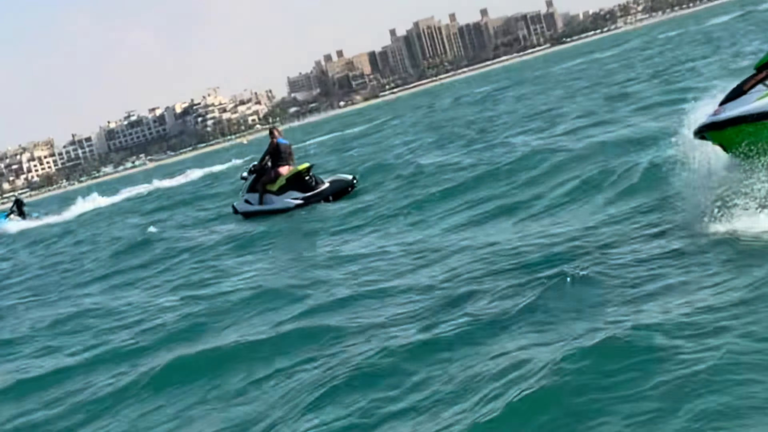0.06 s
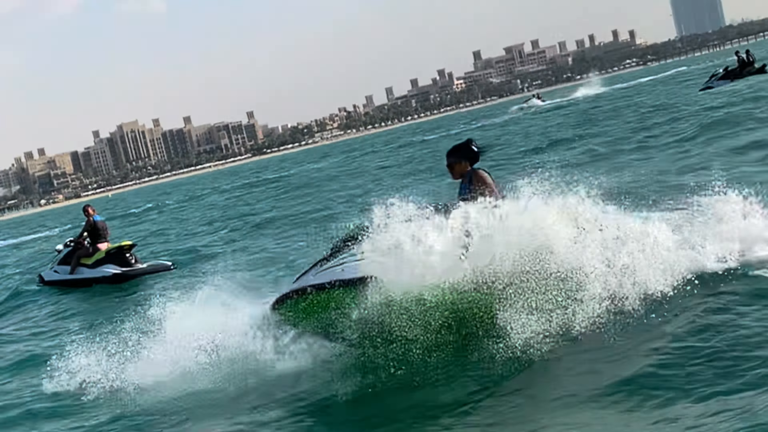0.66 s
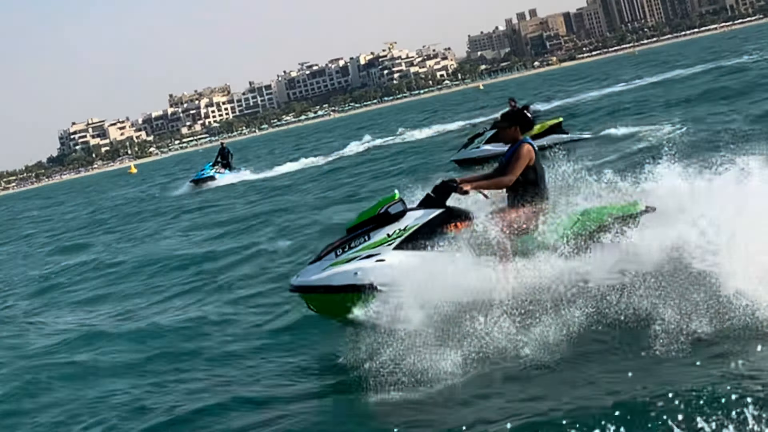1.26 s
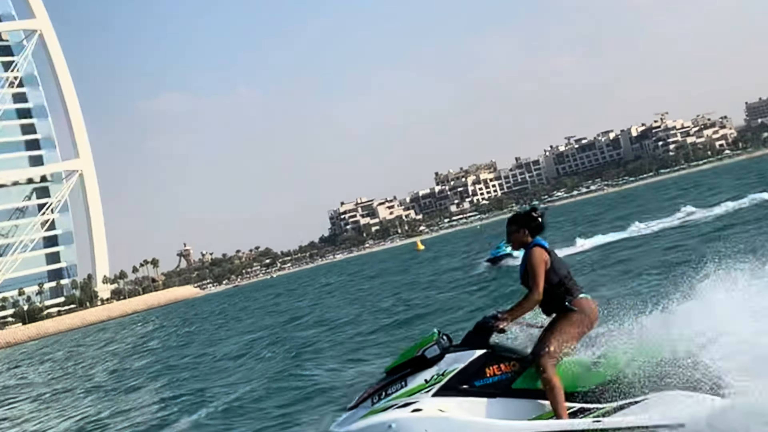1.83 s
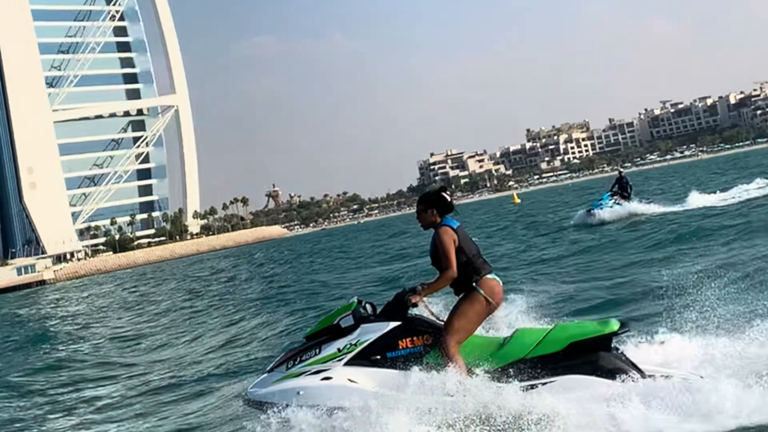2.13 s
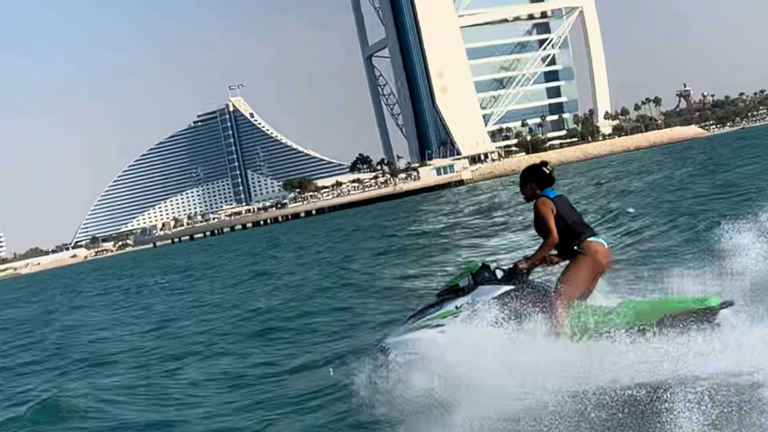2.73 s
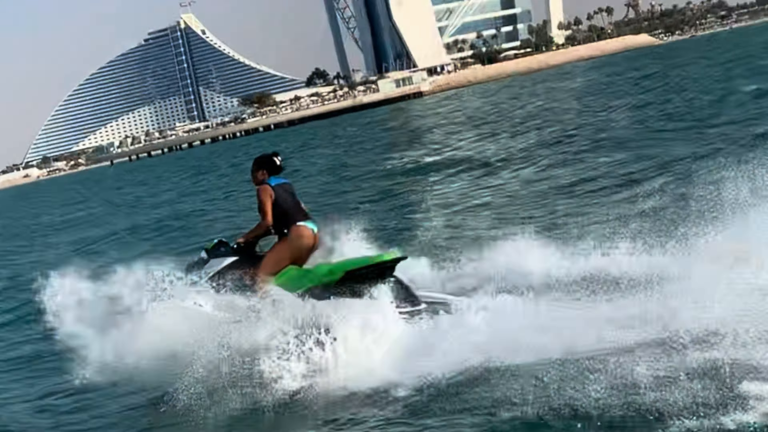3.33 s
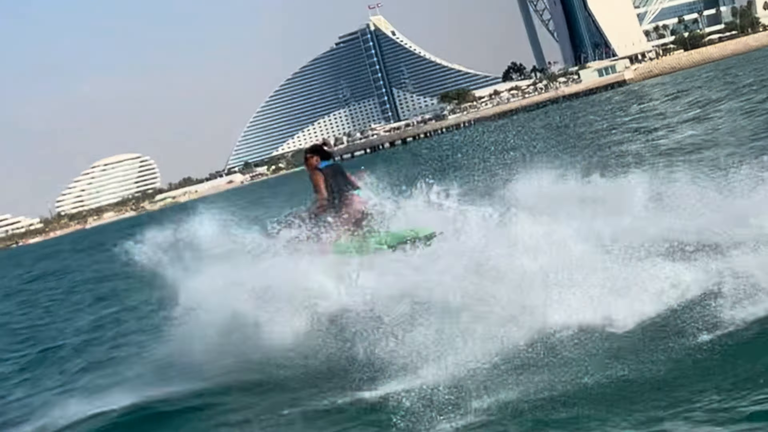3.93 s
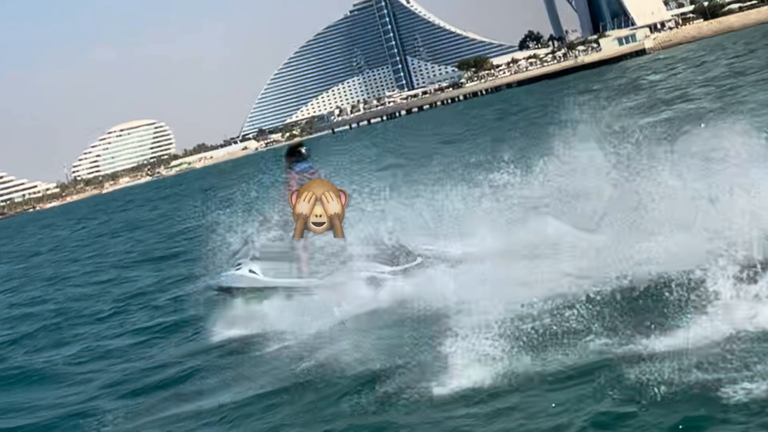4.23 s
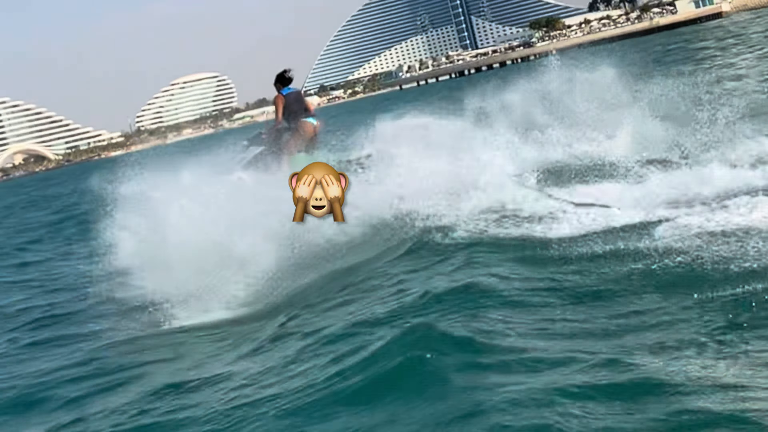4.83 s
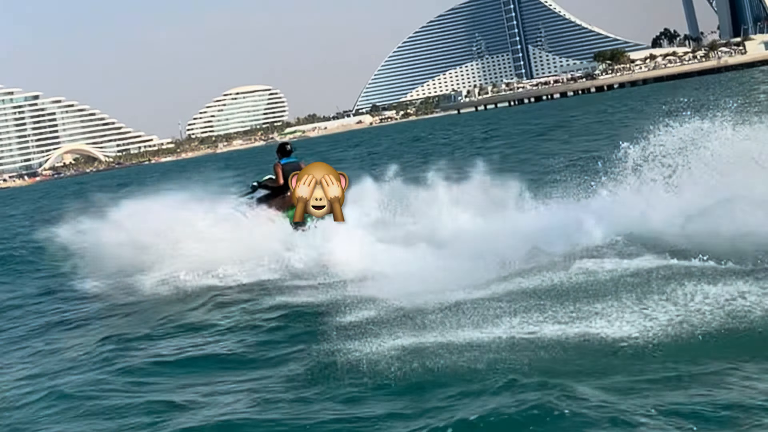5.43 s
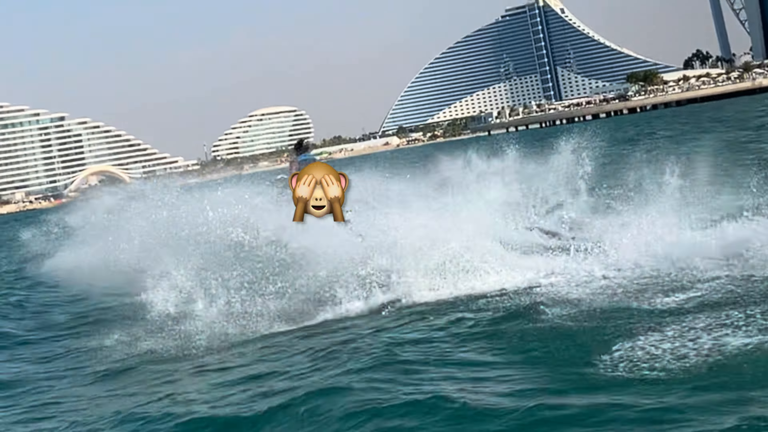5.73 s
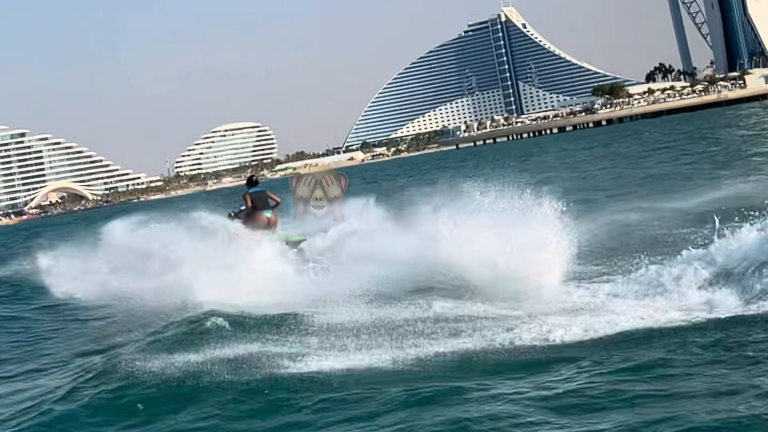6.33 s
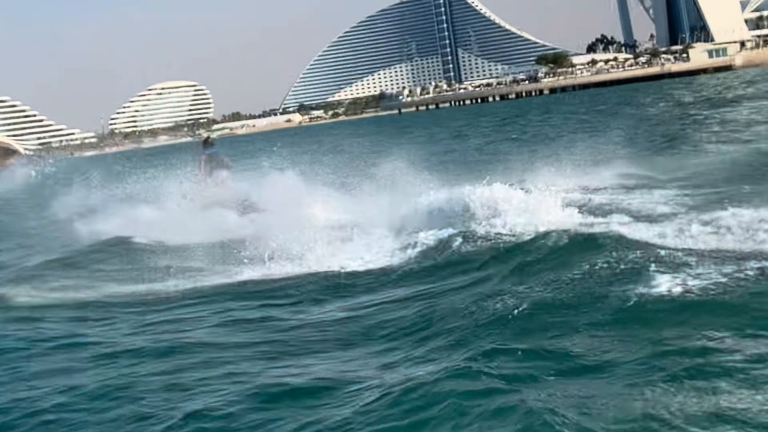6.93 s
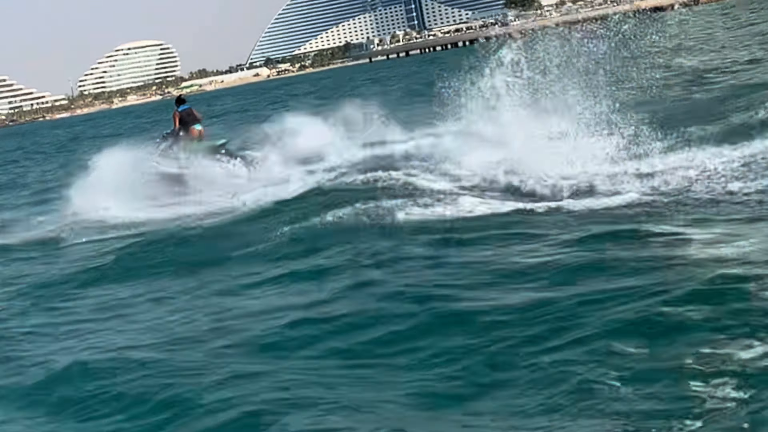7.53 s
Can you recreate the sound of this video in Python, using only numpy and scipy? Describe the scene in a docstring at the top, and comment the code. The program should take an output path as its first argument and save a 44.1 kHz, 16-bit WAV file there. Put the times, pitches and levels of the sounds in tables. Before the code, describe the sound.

Wind rumbles and tears at the microphone while a jet ski's muffled hum rises, sags and grows fainter amid spray and slapping waves.

```python
"""Jet ski on choppy water

The exhaust note rises and sags as the hull rides the waves: clear at first, then dropping
away and returning fainter under the head wind. Eddies buffet, thump and tear at two
microphone ports, once in a burst of sharp cracks. Crests slap the hull; spray hisses throughout."""
import sys
import numpy as np
from scipy import signal
from scipy.fft import rfft, irfft, next_fast_len
from scipy.io import wavfile
from scipy.ndimage import uniform_filter1d, map_coordinates

SR = 44100
rng = np.random.default_rng(int(sys.argv[2]) if len(sys.argv) > 2 else 0)


def wrap_up_sound(samples):
    """Save the sound to the file named by the first command line argument, as 16-bit audio."""
    columns = np.atleast_2d(samples).T
    # keep every value between -1 and 1, then stretch to whole-number steps
    tamed = np.clip(columns, -1, 1)
    steps = np.round(tamed * 32767).astype(np.int16)
    wavfile.write(sys.argv[1], SR, steps)


N = 338247

# left/right correlation set by the port spacing: freq_hz, correlation
PORT_CORRELATION = [(850, 1), (1100, 0.94), (1450, -0.48), (2200, -0.064), (3000, -0.43), (4000, -0.017),
                    (5200, -0.21), (8300, 0.94)]
# spectrum of the finest eddies: freq_hz, density_db
TEARING_SPECTRUM = [(800, -14), (1400, 3.5), (1900, 2.5), (2500, -3), (3200, -9), (4000, -11),
                    (5500, -21.5), (7500, -33), (12000, -56)]


def engine(jitter=0.0054, trim_db=-0.35, hull_hz=333, hull_half_width_hz=11, hull_db=10):
    """Water-muffled exhaust: a strong firing tone, weak overtones that swell in the hull resonance."""
    # engine speed over the waves: time_s, firing_hz
    speed = [(0.0, 125.6), (0.28, 112.1), (0.6, 113.3), (0.77, 123.9), (0.9, 149.2), (1.11, 152.1),
             (1.41, 108.1), (1.75, 112.7), (2.01, 136.7), (2.18, 138.9), (2.31, 132.6), (2.39, 145.6),
             (2.48, 142.8), (2.56, 160.8), (2.73, 160.7), (3.07, 138), (3.29, 117.1), (3.61, 164.0),
             (3.74, 172.3), (3.99, 153.8), (4.25, 113.3), (4.4, 107.5), (4.68, 146.4), (5.0, 122),
             (5.75, 141.5), (6.09, 113.1), (6.41, 107), (6.69, 137.8), (6.81, 129.9), (7.05, 153.7),
             (7.33, 130.9), (7.46, 150.7), (7.58, 145.7), (7.67, 161)]
    # engine level, clear at first, then fainter under the wind: time_s, level_db
    levels = [(0,-9.5),(.26,-12),(.34,-15.5),(.45,-12.5),(.58,-8),(.77,-7.5),(.85,-16),(1.05,-15),(1.18,-16.5),(1.3,-11),(1.42,-30),(1.76,-16),(2.0,-18.5),(2.3,-28),(2.95,-31.5),(3.12,-20.5),(3.4,-22),(3.75,-29.5),(3.98,-22.5),(4.4,-25.5),(4.7,-23),(5.8,-22),(6.15,-27.5),(6.65,-20.5),(7.17,-23.5),(7.35,-34)]
    # exhaust partials: harmonic, level_db, unsteadiness_db
    partials = [(1, 0.5, 1.0), (2, -15, 1.5), (3, -20, 1)]
    firing_hz, = curves(speed)
    level_db, = curves(levels)
    phase = 2 * np.pi * np.cumsum(firing_hz * (1 + jitter * wobble(40))) / SR
    note = np.zeros(N)
    for harmonic, partial_db, unsteadiness_db in partials:
        detuning = (harmonic * firing_hz - hull_hz) / hull_half_width_hz
        boom_db = hull_db / (1 + detuning ** 2)
        gain = amp(partial_db + boom_db + unsteadiness_db * wobble(60))
        note += gain * np.sin(harmonic * phase + rng.uniform(0, 2 * np.pi))
    return amp(level_db + trim_db) * unit(note)


def wind(rumble_trim_db=3.0, buffet_trim_db=4.0, roar_trim_db=-1.95, tearing_trim_db=0.83):
    """Eddies strike the ports: a low rumble and three bands that flutter dozens of times a second."""
    # eddy spectra, large to small: freq_hz, density_db
    rumble_spectrum = [(15, -50), (25, -40), (36, -20), (52, -1.5), (80, -2.5), (115, -4.5), (170, -12),
                       (260, -18.5), (500, -95)]
    buffet_spectrum = [(80, -15.5), (150, -1.5), (220, -2.5), (330, -2), (500, -5.5), (750, -16),
                       (1300, -30), (2500, -84)]
    roar_spectrum = [(250, -48), (480, -3.5), (680, 0), (900, -2.5), (1100, -0.5), (1400, -8.5),
                     (2000, -27), (3000, -19.5), (6000, -83)]
    rumble_db, buffet_db, roar_db, tearing_db = wind_levels()
    common = unit(1.2 * wobble(70) + np.array([wobble(120), wobble(80)]))
    large = flutter(common, mid_db=2.2, side_db=2.6)
    medium = flutter(common, mid_db=2.4, side_db=3.5)
    fine = flutter(common, mid_db=2.2, side_db=4.0)
    rumble = amp(rumble_db + rumble_trim_db) * rush(rumble_spectrum, PORT_CORRELATION)
    buffet = amp(buffet_db + buffet_trim_db) * rush(buffet_spectrum, PORT_CORRELATION, large)
    roar = amp(roar_db + roar_trim_db) * rush(roar_spectrum, PORT_CORRELATION, medium)
    tearing = amp(tearing_db + tearing_trim_db) * rush(TEARING_SPECTRUM, PORT_CORRELATION, fine)
    return rumble + buffet + roar + patchy(tearing, depth_db=3.5)


def wind_levels(rumble_share=0.28):
    """Rumble, buffet, roar and tearing in dB; a bright gust favours the small eddies."""
    # wind between gusts: time_s, rumble_db, roar_db, tearing_db
    steady_wind = [(0,-19,-19,-35), (.17,-19.5,-23.5,-43), (0.3,-17,-29,-47.5), (.55,-21.5,-28.5,-52),
                   (0.77,-25,-32.5,-59), (0.84,-16,-27.5,-43), (1.05,-15.5,-27,-46), (1.3,-19.5,-26.5,-49),
                   (1.44,-17.5,-26.5,-44), (1.54,-17,-22.5,-33.5), (1.8,-17,-20,-32.5), (2.05,-20,-21,-29),
                   (2.2,-22,-31,-40), (2.38,-21.5,-30,-35.5), (2.7,-27.5,-27,-42.5), (3.0,-26.5,-26,-34.5),
                   (3.21,-24.5,-28,-39), (3.37,-19.5,-20,-34.5), (3.7,-22.5,-21,-33), (4.2,-27,-26,-34.5),
                   (4.6,-25.5,-25,-38), (4.78,-27,-26.5,-34), (5.4,-27,-28,-36), (6.0,-26.5,-29.5,-37.5),
                   (6.65,-26,-28,-36), (7.18,-24,-28.5,-39.5), (7.67,-27,-26,-36)]
    rumble_db, roar_db, tearing_db = curves(steady_wind)
    gust_db, bright_db = gusts()
    buffet_db = roar_db + rumble_share * (rumble_db - roar_db)
    return (rumble_db, buffet_db + gust_db - bright_db,
            roar_db + gust_db, tearing_db + gust_db + bright_db)


def gusts():
    """Gusts swell, hold and let go; returns added level and brightness in dB."""
    # gusts: start_s, length_s, attack_s, release_s, rise_db, brightness_db
    events = [(0, 0.24, .02, .035, 1, -1.5), (0.336, 0.15, 0.013, .035, 6.5, 3),
              (1.046, .12, .035, 0.083, 1, -5.5), (1.476, 0.071, 0.009, .03, 5.5, 4.5),
              (2.05, 0.086, 0.025, 0.02, 4.5, 3), (2.406, .11, 0.042, 0.033, 6.5, 1),
              (3.22, 0.388, 0.095, 0.06, 3, 0.5), (6.478, 0.13, 0.031, .05, 3.5, -3),
              (7.417, 0.15, 0.052, 0.15, 6.5, 1)]
    t = np.arange(N) / SR
    gust_db, bright_db = np.zeros((2, N))
    for start_s, length_s, attack_s, release_s, rise_db, brightness_db in events:
        swell = (t - start_s) / attack_s
        release = 1 - (t - start_s - length_s) / release_s
        shape = np.clip(np.minimum(swell, release), 0, 1)
        gust_db += rise_db * shape
        bright_db += brightness_db * shape
    return gust_db, bright_db


def flutter(common, mid_db, side_db, own_weight=0.7):
    """(mid, side) gain of one eddy size, rms 1: common turbulence plus its own."""
    eddies = unit(common + own_weight * np.array([wobble(170), wobble(170)]))
    depth_db = np.array([[mid_db], [side_db]])
    return unit(amp(depth_db * 2 * np.tanh(eddies / 2)))


def cracks(snap_hz=2300, snap_decay_s=0.00025, start_hz=1800, end_hz=480, ragged=0.17, side_db=-11):
    """A hard gust cracks in the port: a snap, a sputter of ticks and a chirp falling in milliseconds."""
    # a burst that sputters out: start_s, snap_db, sputter_db, chirp_db, length_s
    events = [(1.4815, -16.5, -24, -18, 0.0076), (1.535, -15, -16, -22, 0.00895),
              (1.9743, -2.5, -13.5, -11, 0.0084), (2.0703, -9, -24, -12, 0.00704),
              (2.083, -5, -11, -12, 0.0069), (2.0926, -1, -14, -9, 0.0077), (2.0996, -5, -16, -9, 0.0051),
              (2.112, -5, -8.5, -15, 0.0083), (2.1252, -3, -23, -11, 0.00666),
              (2.1404, -1, -15, -9.5, 0.0062), (2.154, -12, -14, -15, .007), (2.17, -16, -17, -18, 0.0084),
              (2.209, -10, -25, -19, 0.00395), (2.245, -22, -26, -33, 0.00499),
              (2.264, -24, -19, -21, .012), (2.2825, -22, -22, -21, .011),
              (2.3015, -22, -17.5, -22, 0.0122), (2.3215, -18, -22, -27, 0.0115),
              (2.336, -21, -21, -32, 0.0093), (2.39, -21, -22, -28, .008), (2.4785, -17, -27, -24, 0.00597),
              (2.492, -17, -24, -22, 0.0052), (2.497, -11, -20, -25, 0.0058), (2.51, -12, -22, -26, 0.0066)]
    # port response: freq_hz, gain_db
    port = [(200, 8), (700, 0), (1900, 4), (3700, -6), (5200, -13.5), (6400, -20), (7500, -41),
            (14000, -55)]
    out = np.zeros((2, N))
    for start_s, snap_db, sputter_db, chirp_db, length_s in events:
        n = round(length_s * SR)
        progress = np.linspace(0, 1, n)
        t = progress * length_s
        hiss, drift = rng.standard_normal((2, 2, SR // 20))
        waver = unit(uniform_filter1d(drift, size=30))[:, :n]
        chirp_hz = start_hz * (end_hz / start_hz) ** progress * np.exp(ragged * waver)
        swell = np.sin(np.pi * progress ** 1.46)
        chirp = swell * np.sin(2 * np.pi * np.cumsum(chirp_hz, axis=1) / SR)
        snap = amp(0.5) * np.sin(2 * np.pi * snap_hz * t) * np.exp(-t / snap_decay_s)
        sputter = amp(4 - 17.4 * progress) * unit(hiss ** 3)[:, :n]  # cubed noise ticks
        crack = amp(snap_db) * snap + amp(sputter_db) * sputter + amp(chirp_db) * chirp
        out[:, round(start_s * SR):][:, :n] += crack
    side_gain = lambda hz: amp(side_db) * along([(850, 0), (1400, 0.93)], hz)
    return filtered(out, lambda hz: amp(along(port, hz)) * [np.ones_like(hz), side_gain(hz)])


def thumps(trim_db=0.1):
    """Single hard eddies hit the ports: small ones knock, large ones boom."""
    # eddy hits: start_s, level_db, t60_s, centre_hz
    hits = [(.041, -14, .05, 1000), (.085, -15.5, 0.055, 900), (.133, -14.5, 0.033, 905),
            (.177, -21.5, .04, 1000), (.19, -15, .16, 230), (.359, -14.5, 0.053, 755),
            (.85, -12, .08, 240.3), (1.08, -13, 0.25, 280), (1.364, -15.5, 0.038, 907),
            (1.386, -19, 0.042, 900), (1.481, -18.5, .03, 900), (1.493, -16.5, .04, 1130),
            (1.535, -9.5, 0.15, 210), (1.628, -12.5, .07, 330), (1.907, -9, 0.053, 841),
            (1.953, -10.5, .09, 750), (2.087, -12, 0.13, 596), (2.588, -24, .04, 900),
            (2.765, -22, .04, 1170), (3.592, -15, 0.037, 970), (3.699, -19, .035, 900),
            (3.839, -20.5, .035, 800), (3.972, -13.5, 0.062, 369.5), (4.058, -22, 0.038, 850),
            (4.435, -22, .2, 251), (4.858, -19, .06, 600), (5.475, -19, .06, 800), (5.704, -18.5, .04, 689),
            (6.322, -23, 0.058, 1150), (7.012, -20.5, 0.038, 905), (7.228, -24, 0.041, 703),
            (7.494, -14, 0.047, 580), (7.531, -17, .05, 900)]
    # eddy spectrum: freq_hz, density_db
    spectrum = [(60, -23), (130, 9), (400, 0), (1100, -6), (1500, -9), (2200, -17), (3200, -25),
                (6000, -70)]
    noise = rush(spectrum, PORT_CORRELATION)
    return amp(trim_db) * bursts(noise, hits, rise_s=0.0011, hold_s=0.0062, focus_db=14, octaves=1.0)


def crackle(count=700, spread_db=4.0, t60_s=0.008, trim_db=-9.5):
    """The smallest eddies tick in the ports, following the tearing level."""
    position, chance = rng.uniform(0, 1, (count, 2)).T
    size = np.minimum(-np.log(1 - chance), 3)  # capped exponential distribution
    ticks = np.bincount((position * N).astype(int), amp(spread_db * size), N)
    decay = amp(-60 * np.arange(SR // 50) / SR / t60_s)
    envelope = signal.fftconvolve(ticks, decay)[:N]
    tearing_db = wind_levels()[-1]
    return amp(tearing_db + trim_db) * rush(TEARING_SPECTRUM, PORT_CORRELATION, envelope)


def slaps():
    """Wave crests smack the hull in short, bright splashes."""
    # crest hits: start_s, level_db, t60_s, centre_hz
    hits = [(1.491, -31, 0.12, 3000), (1.535, -25, 0.076, 1994), (3.668, -25.5, .16, 2400),
            (3.897, -31, .08, 1800), (4.097, -27.5, 0.19, 3303), (4.178, -30.5, 0.072, 1590),
            (4.292, -26.5, 0.13, 1692), (4.703, -29, .08, 1790), (4.847, -29, .07, 1600),
            (5.197, -27.5, .07, 1637), (5.267, -26, .08, 1440), (5.488, -28, 0.047, 1500),
            (5.517, -26, 0.056, 1621), (5.631, -28.5, 0.049, 2560), (6.115, -29, 0.086, 1590),
            (6.322, -28, 0.094, 1500), (6.497, -27.5, .1, 2590), (6.747, -28, 0.075, 2197),
            (6.893, -29, 0.072, 1940), (7.088, -28, .05, 1300), (7.333, -28, .05, 1300)]
    # splash spectrum: freq_hz, density_db
    spectrum = [(400, -10), (1000, 3.5), (1500, 4), (2300, -3), (3000, -6), (4200, -14), (5500, -19),
                (12000, -56)]
    noise = rush(spectrum, PORT_CORRELATION)
    return bursts(noise, hits, rise_s=0.0015, hold_s=0.013, focus_db=7, octaves=0.6)


def spray(trim_db=6.0, fizz_db=0.97):
    """Fine droplets thrown up by the hull fall back as a hiss."""
    # hiss level, ducks sharply at the cracks, then slowly recovers: time_s, level_db
    levels = [(0, -43), (0.4, -39), (0.65, -46.5), (1.05, -40.5), (1.45, -40), (1.62, -43), (1.92, -40.5),
              (2.07, -46.5), (2.15, -59.5), (3.0, -48.5), (3.2, -51.5), (3.45, -50), (4.5, -54.0),
              (5.25, -46.5), (5.62, -54.6), (6.25, -47.5), (6.7, -51.5), (7.05, -48.5), (7.67, -47)]
    # droplet hiss: freq_hz, density_db
    spectrum = [(500, -13), (1300, 16), (2200, 12.5), (3500, 4), (5500, 3.5), (7500, 0.5), (11000, 1.5),
                (15800, -0.5)]
    # left/right likeness, clipped to +-1 in use: freq_hz, correlation
    correlation = [(850, 1), (1150, 0.86), (1330, -1.07), (2600, -1.04), (4000, -0.17), (5100, -1.2),
                   (6500, -0.17), (7800, 0.89), (8800, 1), (10400, 0.18), (11900, -1.04), (12900, -1.15),
                   (14300, 0.2), (15600, 0.77)]
    level_db, = curves(levels)
    return amp(level_db + trim_db) * rush(spectrum, correlation, amp(fizz_db * wobble(500)))


def dip(centre_s=0.797, half_width_s=0.009, depth_db=20):
    """Gain that dips for an instant as the engine drops away."""
    offset = (np.arange(N) / SR - centre_s) / half_width_s
    return amp(-depth_db / (1 + offset ** 2))


def bursts(noise, hits, rise_s, hold_s, focus_db, octaves):
    """Pieces of (mid, side) noise, each with a broad resonance: quick swell, hold, decay."""
    n = SR // 5
    t = np.arange(n) / SR
    hz = np.fft.rfftfreq(n, 1 / SR) + 1
    out = np.zeros((2, N + n))
    for start_s, level_db, t60_s, centre_hz in hits:
        resonance = amp(focus_db * np.exp(-(np.log2(hz / centre_hz) / octaves) ** 2))
        envelope = (1 - np.exp(-t / rise_s)) * amp(-60 * np.maximum(t - hold_s, 0) / t60_s)
        piece = noise[:, rng.integers(N - n):][:, :n]
        burst = irfft(rfft(piece) * resonance, n) * envelope
        burst *= np.linalg.norm(envelope) / np.linalg.norm(burst[0])
        out[:, round(start_s * SR):][:, :n] += amp(level_db) * burst
    return out[:, :N]


def rush(spectrum, correlation, envelope=1):
    """Coloured (mid, side) noise, mid at rms 1."""
    def response(hz):
        angle = np.arccos(np.clip(along(correlation, hz), -1, 1)) / 2
        return amp(along(spectrum, hz)) * [np.cos(angle), np.sin(angle)]
    pair = filtered(rng.standard_normal((2, N)) * envelope, response)
    return pair / np.std(pair[0])


def patchy(x, depth_db):
    """Random shifts of colour in patches of about 20 ms by 500 Hz."""
    spectra = signal.stft(x, nperseg=512)[2]
    patches = uniform_filter1d(rng.standard_normal(spectra.shape), size=6, axis=1)
    patches = uniform_filter1d(patches, size=4, axis=2)
    gain = unit(amp(depth_db * unit(patches)))
    return signal.istft(spectra * gain, nperseg=512)[1][:, :N]


def amp(db):
    """Decibels to gain."""
    return 10 ** (np.asarray(db) / 20)


def unit(x):
    """Scale to rms 1."""
    return x / np.sqrt(np.mean(x ** 2) + 1e-20)


def along(points, hz):
    """Interpolate (freq_hz, value) points on a log axis."""
    freq_hz, values = np.transpose(points)
    return np.interp(np.log(hz + 1), np.log(freq_hz + 1), values)


def curves(rows):
    """One value per sample for each column after time_s."""
    time_s, *columns = np.transpose(rows)
    return [np.interp(np.arange(N) / SR, time_s, column) for column in columns]


def wobble(rate_hz):
    """Smooth random curve, rate_hz knots a second."""
    knots = rng.standard_normal(int(N * rate_hz / SR) + 4)
    return map_coordinates(knots, [np.arange(N) * rate_hz / SR], mode="nearest")


def filtered(x, response):
    """Apply the gain response(hz) by FFT."""
    n = next_fast_len(N + SR // 4)
    return irfft(rfft(x, n) * response(np.fft.rfftfreq(n, 1 / SR)), n)[..., :N]


def scene():
    """Engine in the centre; wind and water spread above the bass."""
    # wind width, narrow when it meets both ports alike: time_s, side_db
    wind_width = [(0, 1.5), (2.07, 0), (2.16, 1), (2.46, -4), (2.6, 1), (3.35, 3), (3.6, 1), (4.7, 1),
                  (5.0, -1.5), (5.65, -3), (5.85, 1), (6.32, -5), (6.48, 1.5), (7.67, -1)]
    side_db, = curves(wind_width)
    air = (wind() + thumps() + crackle()) * [np.ones(N), amp(side_db)]
    mid, side = air + cracks() + slaps() + spray()
    mid = mid + engine()
    return np.array([mid + side, mid - side]) * dip()


def record(dry, ceiling=0.94, cutoff_hz=15800):
    """Soft peak limiting, then a brick-wall low-pass."""
    rounded = dry / (1 + np.abs(dry / ceiling) ** 8) ** (1 / 8)
    return filtered(rounded, lambda hz: hz < cutoff_hz)


dry = scene()
out = record(dry)
wrap_up_sound(out)
```